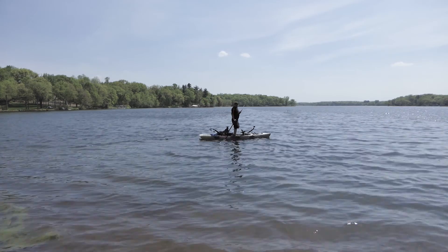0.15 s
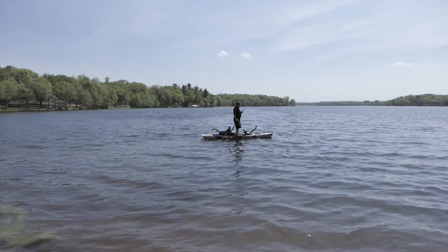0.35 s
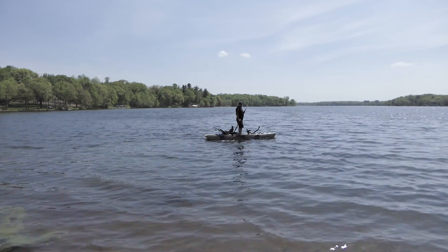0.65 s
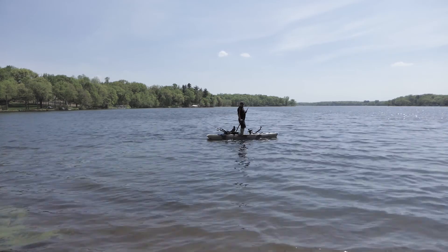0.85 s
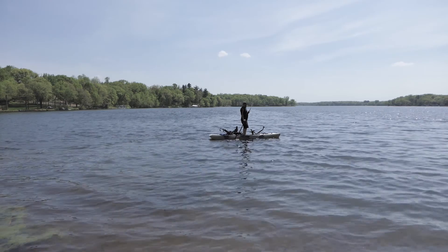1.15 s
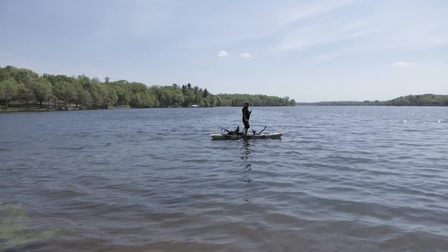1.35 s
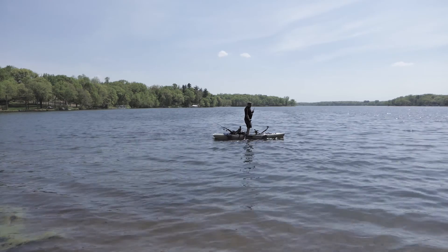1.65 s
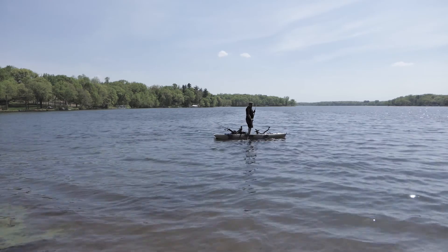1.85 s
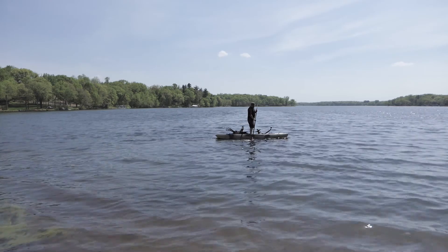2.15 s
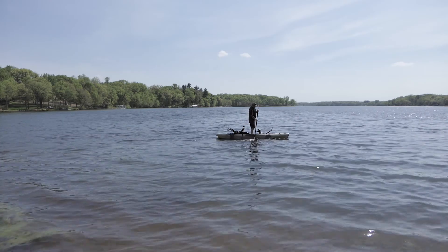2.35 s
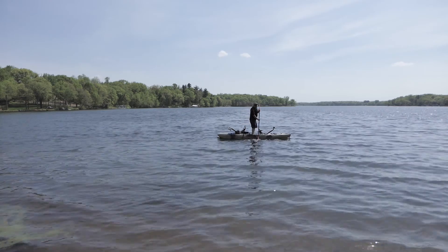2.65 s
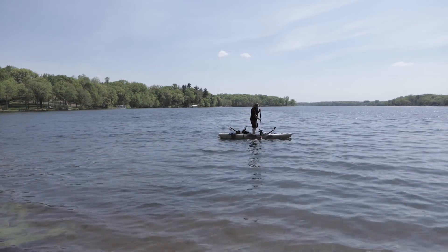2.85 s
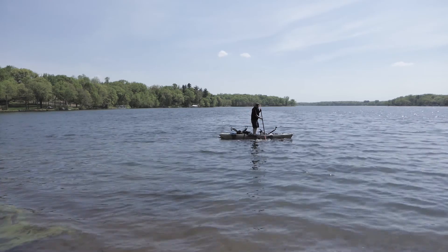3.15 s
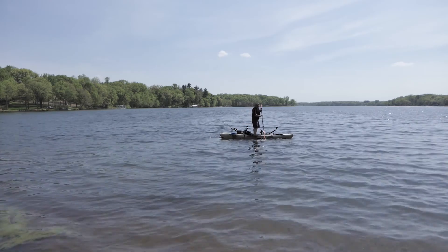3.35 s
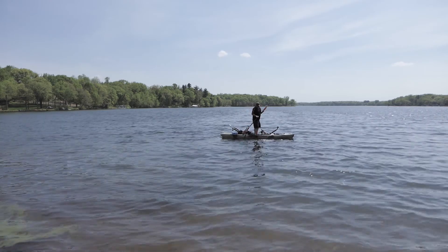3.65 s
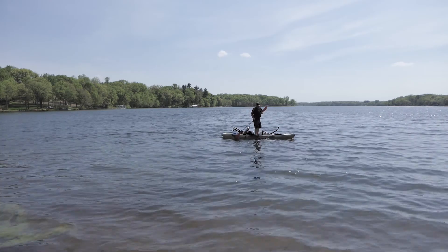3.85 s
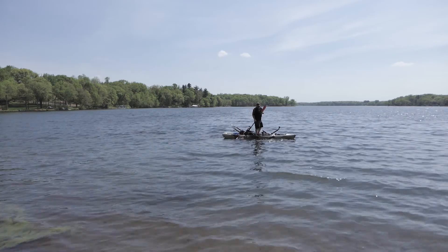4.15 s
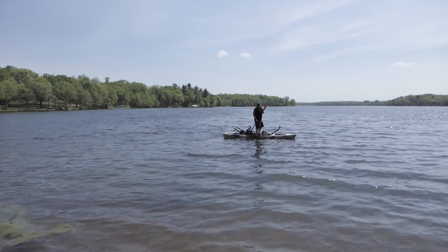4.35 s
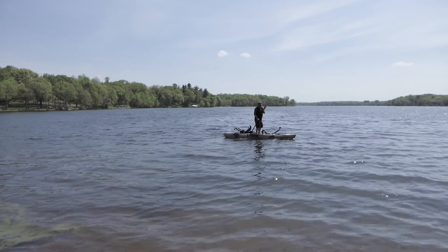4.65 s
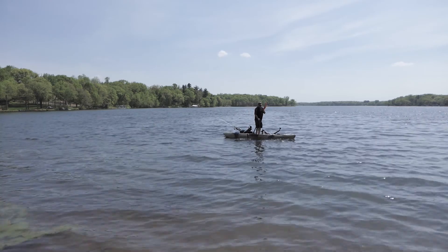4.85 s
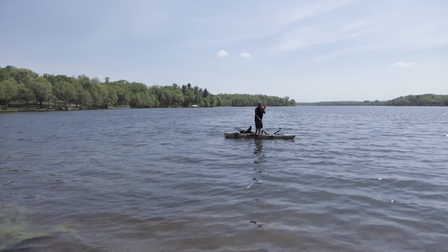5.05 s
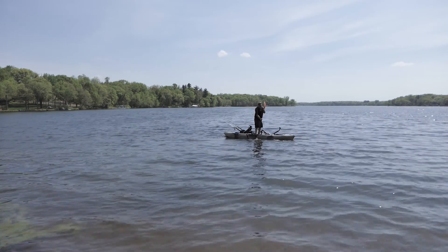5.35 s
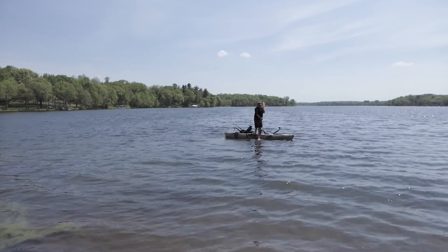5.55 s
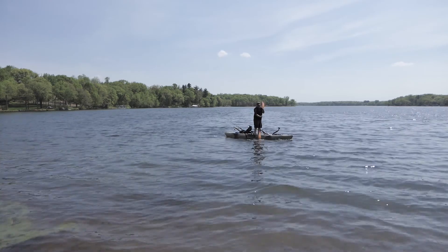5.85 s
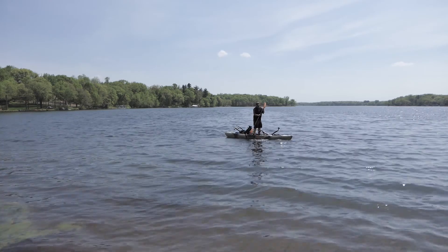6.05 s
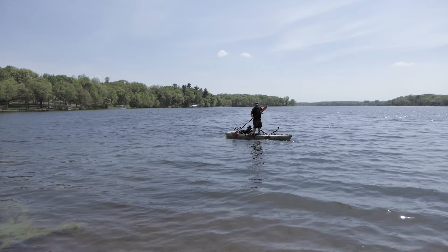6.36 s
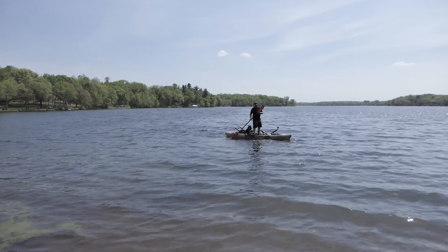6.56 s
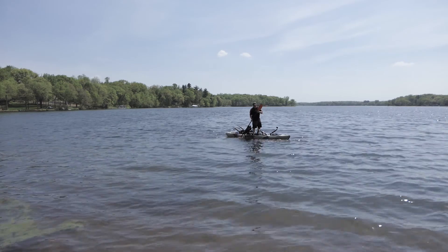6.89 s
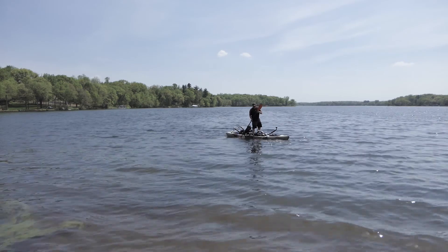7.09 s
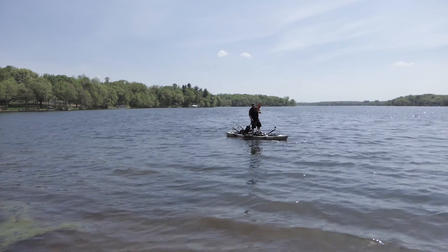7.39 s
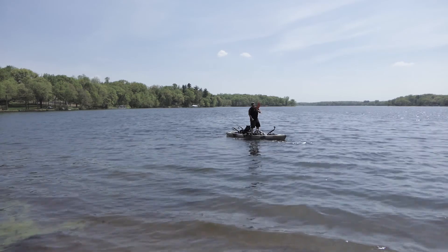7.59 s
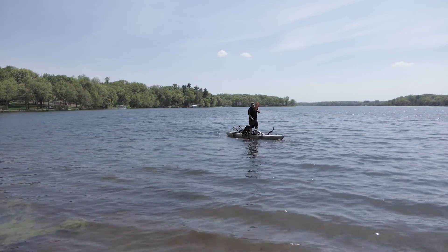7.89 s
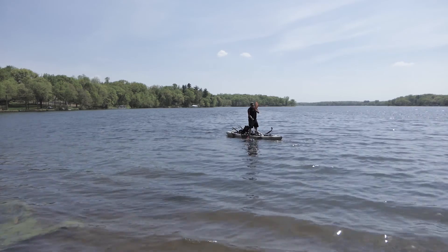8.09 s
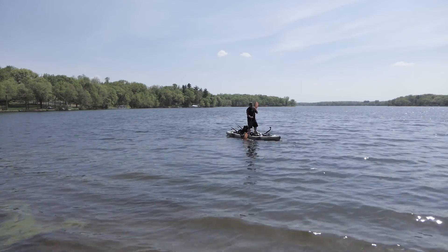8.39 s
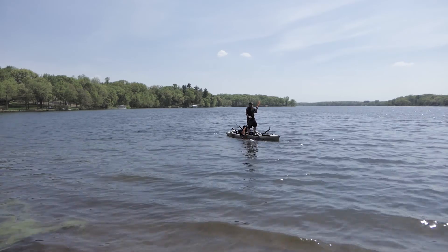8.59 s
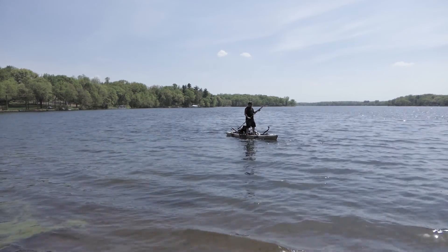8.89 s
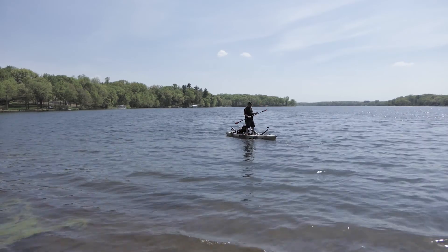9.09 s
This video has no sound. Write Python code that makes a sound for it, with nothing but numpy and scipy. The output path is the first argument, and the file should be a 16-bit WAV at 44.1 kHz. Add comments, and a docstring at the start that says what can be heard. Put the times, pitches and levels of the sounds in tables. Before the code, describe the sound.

Gentle lake water washes and trickles nearby, plopping and slapping now and then, before low wind buffets the microphone near the end.

```python
"""Small waves on a lake shore

Close to the microphone, waves lap in a wash of noise and countless small bubbles, with plops and drips
as damped sines over short noise puffs. Now and then trapped air slaps in a hollow: boom, crack, splash.
Wind buffets the microphone ports as shaped low noise; a bird whistles twice in falling sines.
Far off lie a rumble of low noise and a drone of two wavering sines."""
import sys
import numpy as np
from scipy import signal
from scipy.fft import rfft, irfft, next_fast_len
from scipy.io import wavfile
from scipy.ndimage import uniform_filter1d, map_coordinates

SR = 44100
rng = np.random.default_rng(int(sys.argv[2]) if len(sys.argv) > 2 else 0)


def generate_wav(signal):
    """Clip the signal to [-1, 1] and save it as 16-bit WAV at the path in sys.argv[1]."""
    frames = np.transpose(np.atleast_2d(signal))
    scaled = np.clip(frames, -1, 1) * 32767
    pcm = np.round(scaled).astype(np.int16)
    wavfile.write(sys.argv[1], SR, pcm)


N = 407043  # samples

# All levels are set ahead of the microphone's colour; a positive left-right difference is louder on the left.

# Spectrum of the merged far ripples: [f/Hz, relative density/dB per Hz]
WASH_SPECTRUM = [(250, -13), (420, -2), (579, -0.5), (850, 3), (1650, 0), (5000, -23), (11000, -120)]
# Spectrum of the fine spray: [f/Hz, relative density/dB per Hz]
SPRAY_SPECTRUM = [(1470, -21), (2500, 0), (8200, -12), (15200, -13), (16000, -28)]
# How alike left and right are in the wash, spray and rumble: [f/Hz, correlation]
STEREO_LIKENESS = [(500, 0.041), (2000, 0.48), (5000, 0.36), (10000, 0.013)]


def lapping():
    """Far ripples merge into noise; near ones stand out as gurgles, splashes and fine spray."""
    wash_db, spray_db, pan_db = waves()
    surge = wobble(8)
    wash_gain = amp(wash_db - 0.5 + 1.44 * surge)
    wash = wash_gain * rush(WASH_SPECTRUM, STEREO_LIKENESS, patchy_db=0.4)
    spray_gain = amp(spray_db + 0.82 * surge + 1.8 * wobble(30))
    spray = spray_gain * rush(SPRAY_SPECTRUM, STEREO_LIKENESS, patchy_db=0.94)
    gurgle = swarm(wash_db - 6.0, count=6000, centre_hz=1301.6, spread=0.55, cycles=4.61,
                   scatter_db=2.5, clump_s=.06, rise=0.08, size=420)
    fizz = swarm(spray_db - 12.0 + 2.07 * surge, count=12000, centre_hz=5620, spread=0.45, cycles=2.63,
                 scatter_db=6.0, clump_s=0.0073, rise=0.069, size=90)
    crests = splashes(spray_db - 6.5, count=500)
    return sides(pan_db) * (wash + spray + crests + fizz + stones(gurgle))


# Each small wave as it breaks: [crest t/s, wash level/dB, spray level/dB, left-right level/dB]
BREAKING_WAVES = [(.24, -42, -51.5, -1), (1.5, -42.5, -49.5, -3), (2.1, -47.5, -56, 3.5),
                  (2.7, -44, -52.5, -1), (3.98, -46, -52.5, 0), (4.75, -49.5, -56.5, 1),
                  (5.4, -49.5, -55, -3), (6.05, -48, -67, -3), (6.45, -65, -55.5, -16),
                  (7.12, -45.5, -52.5, 0), (7.55, -55.5, -53, -38), (7.99, -42, -51, -1.5),
                  (9.25, -45, -53, 3.5)]
RISE_S, EBB_S = 0.31, 0.37  # a wave swells to its crest and drains away
CALM_WASH_DB, CALM_SPRAY_DB, CALM_PAN_DB = -48, -55.5, -5.5  # steady ripples beneath the waves


def waves():
    """Wash and spray powers of all waves add to the calm; place is averaged by wash power."""
    crest_s, wash_db, spray_db, pan_db = np.transpose(BREAKING_WAVES)[:, :, None]
    after = np.arange(N) / SR - crest_s
    swell = np.exp(-(after / np.where(after < 0, RISE_S, EBB_S)) ** 2)
    wash, calm = amp(2 * wash_db) * swell, amp(2 * CALM_WASH_DB)  # doubled dB gives power
    spray = (amp(2 * spray_db) * swell).sum(axis=0) + amp(2 * CALM_SPRAY_DB)
    total = wash.sum(axis=0) + calm
    place_db = ((wash * pan_db).sum(axis=0) + calm * CALM_PAN_DB) / total
    return 10 * np.log10(total), 10 * np.log10(spray), place_db


def swarm(level_db, count, centre_hz, spread, cycles, scatter_db, clump_s, rise, size):
    """Random bubbles in clumps of eight, each starting softly; rare ones are much louder."""
    u, g = rng.random((count, 3)), rng.standard_normal((count, 4))
    clump_start = np.repeat(u[::8, 0], repeats=8)[:count] * N / SR
    s = np.clip(clump_start + clump_s * u[:, 1], 0, (N - 1) / SR)
    db = level_db[(s * SR).astype(int)] - scatter_db * np.log(1 - u[:, 2] * 49 / 50)
    hz = np.clip(centre_hz * np.exp(spread * g[:, 0]), 650, 13000)
    pan_db = 4.3 * g[:, 1]
    life = cycles * np.exp(0.567 * g[:, 2])
    glide = rise * np.exp(g[:, 3:] / 2)
    return bubbles(s, db, hz, pan_db, life, glide, size=size, onset=1.45)


def splashes(level_db, count):
    """Tiny crests breaking at random: broad puffs from the middle to the treble."""
    u = rng.random((count, 3))
    db = level_db[(u[:, 0] * N).astype(int)] - 8.0 * np.log(1 - u[:, 1] * 29 / 30)  # rare ones are louder
    pan_db = 8 * (u[:, 2] - .5)
    burst = puffs(zip(u[:, 0] * N / SR, db, pan_db), t60=0.012, rise_s=0.0026)
    return filtered(burst, lambda f: 1 / (1 + (900 / (f + 1)) ** 2) / np.sqrt(1 + (f / 3000) ** 2))


# Single large bubbles near the microphone: [t/s, peak level/dB, f/Hz, left-right level/dB]
LARGE_BUBBLES = [(.191, -31, 1900, 0), (.21, -33, 1040, -2), (.35, -33, 830, 4), (0.891, -34.5, 1310, -17),
                 (1.394, -33, 2130, -12), (1.534, -29, 1070, -10), (2.752, -31, 800, -2),
                 (3.751, -29.5, 1004, 2), (3.938, -31.5, 850, -7), (4.016, -34, 1500, -7),
                 (4.023, -30.5, 840, -8), (4.033, -28, 1600, -6), (4.132, -22.5, 1450, -7),
                 (4.557, -34.5, 537, 3), (4.709, -33, 1390, 13), (4.846, -31, 695, 0),
                 (4.906, -31.5, 947, -9), (5.347, -31.5, 1140, -3), (5.415, -32.5, 706, -10),
                 (5.862, -37, 1340, -5), (5.906, -31, 1130, -6), (6.083, -30.5, 960, -5),
                 (6.366, -29, 1560, -12), (6.423, -36, 1430, -12), (7.185, -29.5, 1580, -2),
                 (7.356, -34, 1460, -12), (7.951, -27.5, 940, -4), (7.962, -31, 1750, -3),
                 (8.197, -29, 2000, -4), (8.247, -27, 1270, -8), (8.522, -35, 1580, -6),
                 (9.077, -31, 840, -2)]
SMACK_DB = -3.5  # smack before its filter, against the bubble's peak


def plops():
    """Single large bubbles, each born in a small dull smack."""
    s, db, hz, pan_db = np.transpose(LARGE_BUBBLES)
    burst = puffs(zip(s, db + SMACK_DB, pan_db), t60=0.046, rise_s=0.00075)
    smack = filtered(burst, lambda f: 1 / (1 + (700 / (f + 1)) ** 2) / (1 + (f / 3000) ** 4))
    return bubbles(s, db, hz, pan_db, 5.4, 0.13, size=1800, onset=13.5) + smack


# Drips and bursting drops: [t/s, ring peak level/dB, ring f/Hz, impact level before its filter/dB]
DROPS = [(.184, -34.5, 4200, -54), (.209, -30, 2780, -55), (0.214, -26.5, 3500, -55),
         (0.246, -33, 2900, -47), (1.3046, -21.5, 2630, -38), (1.347, -26, 6530, -34),
         (1.676, -25.5, 2500, -43), (1.706, -42, 2820, -29.5), (2.231, -29, 5400, -42),
         (2.2425, -27, 2460, -30.5), (2.864, -38, 3830, -47), (3.115, -38, 3380, -34.5),
         (3.466, -29.5, 3030, -43), (4.0194, -30, 3140, -30), (4.5336, -30, 3820, -50),
         (4.585, -33.5, 7050, -37), (6.044, -36, 4200, -40), (6.406, -33, 3340, -40),
         (6.482, -33, 5160, -44), (6.501, -27, 5400, -45), (6.507, -31, 3200, -38),
         (6.513, -28.5, 4220, -32), (6.521, -41, 3260, -38), (6.6217, -34, 3580, -54),
         (6.641, -33, 2550, -53), (6.8155, -36, 3900, -35.5), (7.501, -38, 2780, -31.5),
         (7.6, -27.5, 3660, -61), (7.6827, -34, 2600, -55)]
DRIP_PAN_DB, IMPACT_LEAD_S = -4, .002


def drips():
    """A short damped ring with the hiss of the impact on top, begun just ahead of it."""
    s, db, hz, impact_db = np.transpose(DROPS)
    pan_db = np.full(len(s), DRIP_PAN_DB)
    burst = puffs(zip(s - IMPACT_LEAD_S, impact_db, pan_db), t60=.01, rise_s=.003)
    impact = filtered(burst, lambda f: 1 / (1 + (2000 / (f + 1)) ** 2) / (1 + (f / 13500) ** 2))
    return bubbles(s, db, hz, pan_db, 2.5, 0.033, size=400, onset=1.6) + impact


# Waves slapping into a hollow; the crack and splash lie half as far aside as the boom:
# [t/s, boom envelope peak/dB, boom f/Hz, boom left-right level/dB, crack envelope peak/dB, crack f/Hz]
HOLLOW_SLAPS = [(1.303, -44, 220, -18, -26.5, 720), (1.345, -44.5, 223, -13, -32, 476),
                (2.2429, -48, 182, -18, -16.5, 1020), (3.017, -52, 240, -19, -30, 800),
                (4.1372, -32, 180, 3, -15, 740), (4.944, -45, 222, -15, -32, 800)]
SPLASH_DB = -1.5  # splash noise before its filter, against the crack


def slaps():
    """The trapped air booms briefly under a solid crack and a dull splash; both pitches fall."""
    s, db, hz, pan_db, crack_db, crack_hz = np.transpose(HOLLOW_SLAPS)
    boom = bubbles(s, db, hz, pan_db, 3.2, -0.1, size=4000)
    crack = bubbles(s, crack_db, crack_hz, pan_db / 2, 0.83, -0.21, size=600, onset=3.3)
    tail = puffs(zip(s, crack_db + SPLASH_DB, pan_db / 2), t60=0.18, rise_s=0.0017)
    splash = filtered(tail, lambda f: 1 / (1 + (f / 1200) ** 3) / (1 + (180 / (f + 1)) ** 4))
    return boom + crack + splash


# Wind on the microphone ports: [t/s, strength/dB]
WIND_STRENGTH = [(0.0, -67), (0.75, -53), (1.6, -61.5), (4.05, -56.5), (4.32, -49), (4.4, -59),
                 (6.0, -56.5), (6.7, -43), (7.25, -58), (7.85, -54.5), (7.95, -41.5), (8.2, -34.5),
                 (8.5, -37), (8.7, -32), (8.85, -30.5), (8.9, -37.5), (9.23, -34.5)]
# Spectrum of the wind's push: [f/Hz, relative density/dB per Hz]
BUFFET_SPECTRUM = [(18, 3), (38, 3.5), (62, 1.5), (87, -16), (131, -5), (175, -14), (280, -35.5),
                   (450, -120)]
# Stronger wind flutters faster: the part above this pitch gains dB per dB of wind
FLUTTER_HZ, FLUTTER_FROM_DB, FLUTTER_GROWS = 97, -29, 0.095


def wind():
    """Lumpy low noise on each port; strong pushes flatten off."""
    wind_s, strength_db = np.transpose(WIND_STRENGTH)
    wind_db = np.interp(np.arange(N) / SR, wind_s, strength_db)
    lumps = amp(1.9 * wobble(14) + 2.6 * np.array([wobble(9.9), wobble(12)]))
    noise = rush(BUFFET_SPECTRUM, [(50, -0.17), (150, 0.69)], patchy_db=-1.5)
    push = unit(np.tanh(0.94 * lumps * noise))
    flutter = filtered(push, lambda f: 1 / (1 + (FLUTTER_HZ / (f + 1)) ** 6))
    flutter_gain = amp(FLUTTER_GROWS * (wind_db - FLUTTER_FROM_DB))
    return amp(wind_db) * (push - flutter + flutter_gain * flutter)


# Distant bird whistles: [t/s, length/s, first f/Hz, last f/Hz, level before wavering/dB]
WHISTLES = [(0.876, .125, 2760, 2380, -51), (8.265, 0.048, 3070, 2520, -47)]
BEND = 2.62  # the fall is quick at first


def bird():
    """Faint falling sine whistles, unsteady from afar."""
    out, waver_db = np.zeros(N), 2.3 * wobble(60)
    for s, length, first_hz, last_hz, db in WHISTLES:
        start, n = round(s * SR), round(length * SR)
        hz = last_hz + (first_hz - last_hz) * np.linspace(1, 0, n) ** BEND
        gain = amp(db + waver_db[start:][:n]) * np.hanning(n) ** .35
        out[start:][:n] += gain * np.sin(2 * np.pi * np.cumsum(hz) / SR)
    return out


# Spectrum of the distant rumble: [f/Hz, relative density/dB per Hz]
RUMBLE_SPECTRUM = [(85, -47), (119, -4.5), (146, -7), (221, -7.5), (320, -19), (600, -120)]


def rumble():
    """Distant low noise, patchy in level."""
    return amp(-60) * rush(RUMBLE_SPECTRUM, STEREO_LIKENESS, patchy_db=1.5)


# The far drone's two tones: [f/Hz, level before wavering/dB]
DRONE_TONES = [(63, -64), (118.4, -63)]


def drone():
    """Far low sines whose level and phase waver slowly."""
    t = np.arange(N) / SR
    return sum(amp(db + 2.3 * wobble(1.72)) * np.sin(2 * np.pi * hz * t + 1.77 * wobble(3))
               for hz, db in DRONE_TONES)


def bubbles(s, db, hz, pan_db, cycles, rise, size, onset=5):
    """Damped sines living some cycles; pitch rises as a bubble nears the surface (negative rise: falls)."""
    t = np.arange(size) / SR
    age = t * (hz / cycles)[:, None]
    phase = 2 * np.pi * hz[:, None] * t * (1 + rise * (np.minimum(age, 2) / 2 - .5))
    shape = np.exp(-age) * (1 - np.exp(-onset * age))
    wave = amp(db)[:, None] * shape / shape.max(axis=1, keepdims=True) * np.sin(phase)
    at = ((s * SR).astype(int)[:, None] + np.arange(size)).ravel()
    return np.array([np.bincount(at, (wave * g[:, None]).ravel(), N + size)[:N] for g in sides(pan_db)])


def puffs(rows, t60, rise_s):
    """Bursts of white noise that swell quickly and die: rows of (t/s, level/dB, left-right level/dB)."""
    t, out = np.arange(round(t60 * SR) + 200) / SR, np.zeros((2, N + SR))
    shape = amp(-60 * t / t60) * (1 - np.exp(-(t / rise_s) ** 2))
    shape = shape / shape.max()
    for s, db, pan_db in rows:
        burst = amp(db) * shape * rng.standard_normal(len(t))
        out[:, round(s * SR):][:, :len(t)] += sides(pan_db)[:, None] * burst
    return out[:, :N]


def stones(x):
    """Wet stones and the water surface scatter weak copies within 14 milliseconds."""
    t = np.arange(600) / SR
    tail = rng.standard_normal((2, len(t))) * amp(-60 * t / 0.1)
    tail = tail / np.linalg.norm(tail[0])
    return x + amp(-7) * signal.fftconvolve(x, tail, axes=1)[:, :N]


def rush(spectrum, alike, patchy_db):
    """Stereo noise of rms 1 with patches of random gain in time and frequency."""
    z = signal.stft(rng.standard_normal((2, N)), nperseg=256)[2]
    field = uniform_filter1d(rng.standard_normal(z.shape[1:]), size=4, axis=0)
    field = uniform_filter1d(field, size=6, axis=1)
    pair = signal.istft(z * amp(patchy_db * unit(field)), nperseg=256)[1][:, :N]

    def mid_side_response(hz):
        turn = np.arccos(np.clip(along(alike, hz), -1, 1)) / 2  # splits power to set the correlation
        return amp(along(spectrum, hz)) * [np.cos(turn), np.sin(turn)]

    mid, side = filtered(pair, mid_side_response)
    return unit(np.array([mid + side, mid - side]))


def wobble(rate):
    """A smooth random curve, rate knots a second."""
    return map_coordinates(rng.standard_normal(int(N * rate / SR) + 4), [np.arange(N) * rate / SR])


def filtered(x, response):
    """x times a response of frequency."""
    m = next_fast_len(N + 8192)
    return irfft(rfft(x, m) * response(np.fft.rfftfreq(m, 1 / SR)), m)[..., :N]


def along(points, hz):
    """Values between (f/Hz, value) points on a log axis."""
    f, v = np.transpose(points)
    return np.interp(np.log(hz + 1), np.log(f + 1), v)


def sides(pan_db):
    """Left and right gain for a left-right level difference."""
    return amp(np.array([pan_db / 2, -pan_db / 2]))


def amp(db):
    """Amplitude for a level in dB."""
    return 10 ** (np.asarray(db) / 20)


def unit(x):
    """x scaled to rms 1."""
    return x / np.sqrt(np.mean(x ** 2) + 1e-20)


def scene():
    """The near water first, then the bird and the lows, which lean to the right."""
    water = lapping() + stones(plops() + drips()) + slaps()
    lows = sides(-3.1)[:, None] * (wind() + drone() + rumble())
    return water + bird() + lows


# The microphone's colour, a dip in the low middle and a soft top: [f/Hz, gain level/dB]
MICROPHONE_COLOUR = [(240, 0), (300, -9.5), (400, -10.5), (560, -4), (9000, 2.5), (15800, -8.5)]
TOP_HZ = 15850


def record(dry):
    """The microphone's colour; nothing is kept above the band limit."""
    return filtered(dry, lambda hz: amp(along(MICROPHONE_COLOUR, hz)) * (hz < TOP_HZ))


dry = scene()
out = record(dry)
generate_wav(out)
```